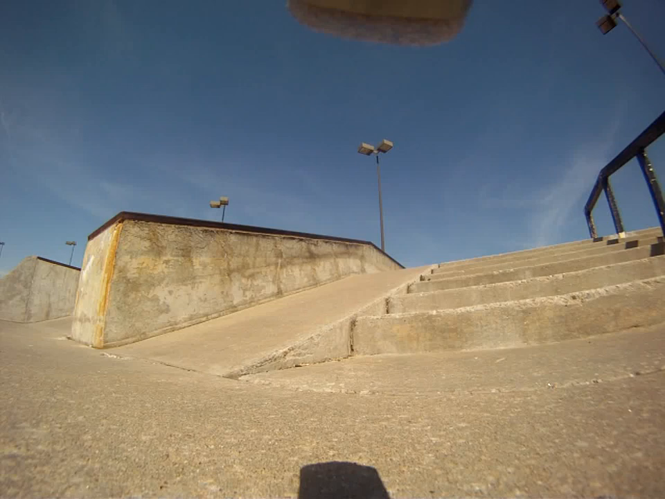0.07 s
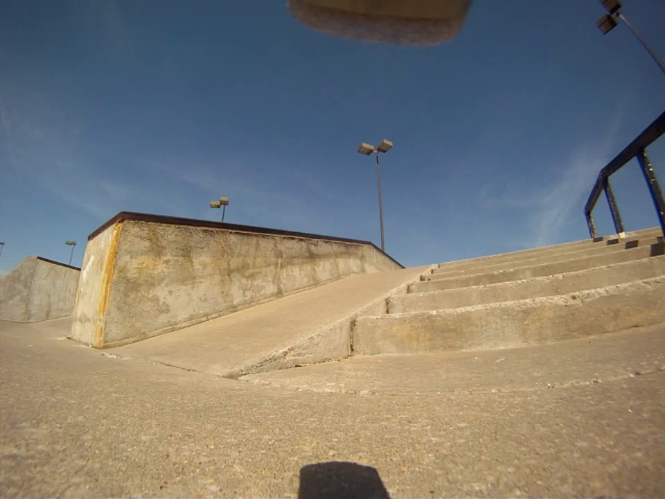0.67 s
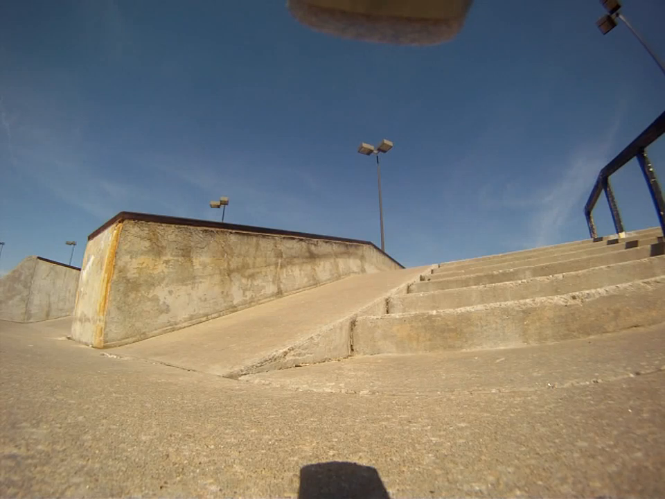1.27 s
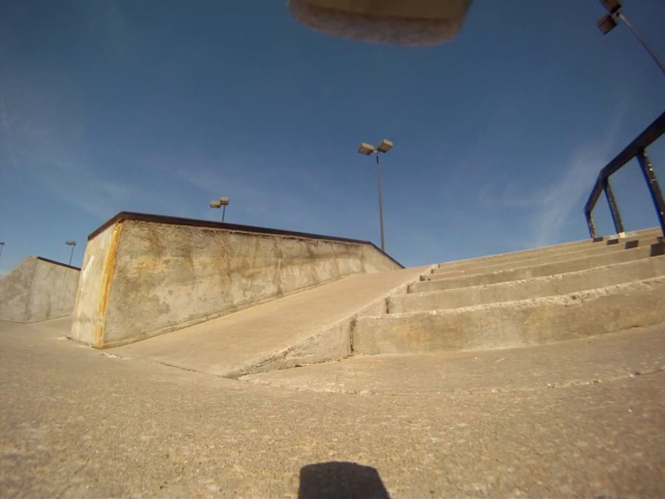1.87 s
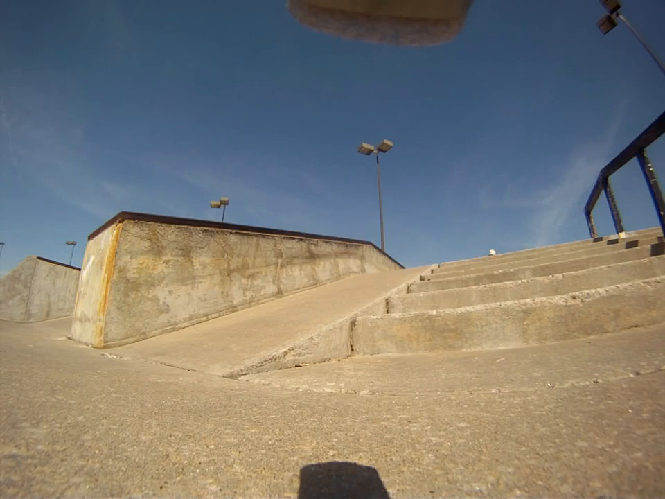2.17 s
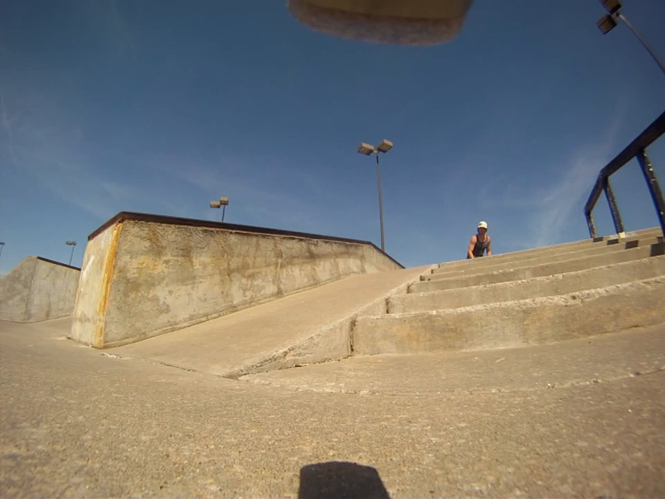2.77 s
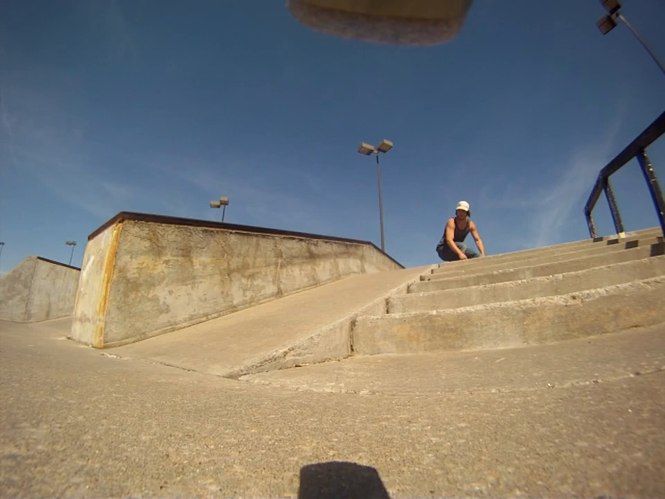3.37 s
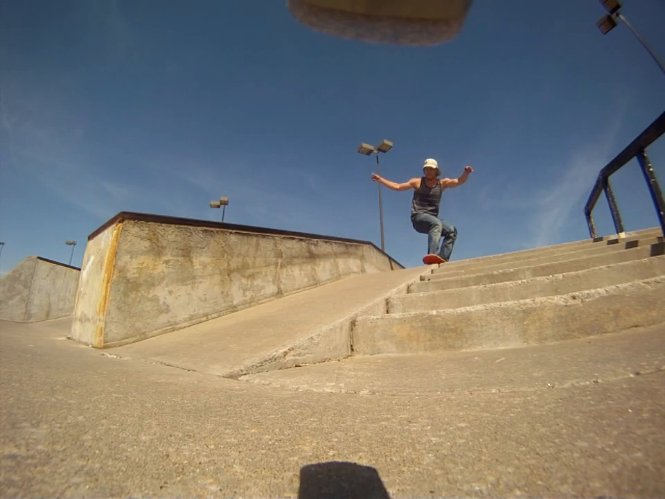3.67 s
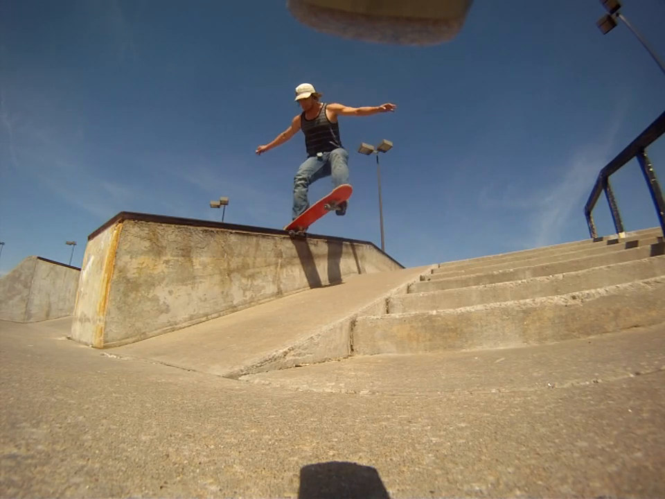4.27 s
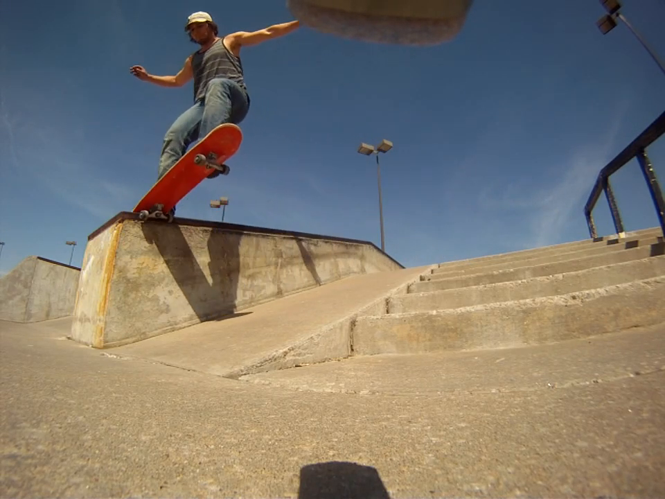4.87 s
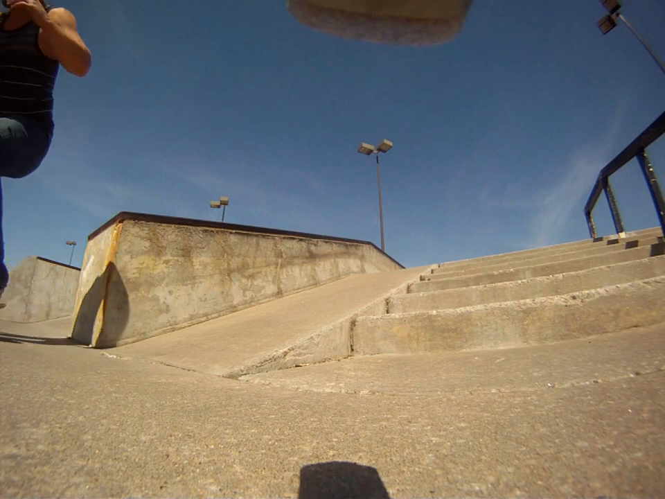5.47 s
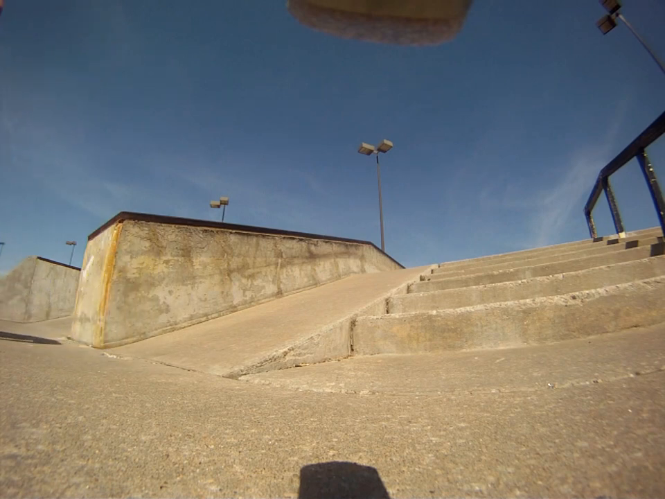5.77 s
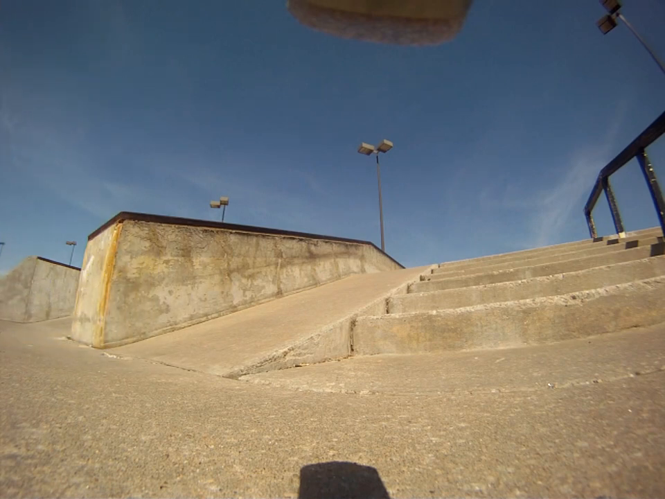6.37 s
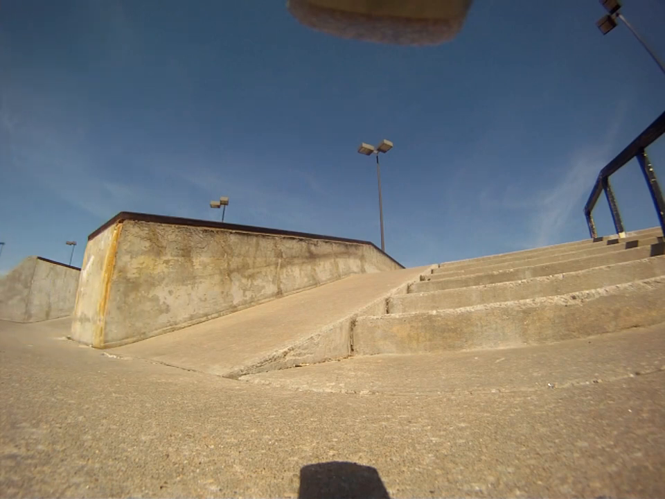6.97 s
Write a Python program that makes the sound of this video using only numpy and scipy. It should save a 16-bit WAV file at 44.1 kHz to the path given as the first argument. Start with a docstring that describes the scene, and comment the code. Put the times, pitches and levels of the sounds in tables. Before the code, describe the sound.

A skateboard approaches with a low hum of wheels, snaps into the air and hits a concrete ledge with sharp clacks. Its truck slides along the edge for under a second with a gritty scrape and wavering squeals. A hard landing thumps near the microphone, then the wheels roll off softly with a few ticks. The microphone sits on the ground in a quiet outdoor skate park and sounds a little plasticky and lo-fi.

```python
"""A skateboard grinds down a concrete ledge on one truck, its metal sticking and slipping into squeals
over a scrape of crushed grit. Hard wheels rumble up, the tail pops and the truck clacks onto the edge;
after the grind the maple deck slams down close by and rolls off, ticking over joints. Behind it is
the hush of an open skate park. All is heard from the ground, through a ringing plastic case and a
coarse 12 kHz converter that holds each sample."""
import sys
import numpy as np
from scipy import signal
from scipy.fft import rfft, irfft
from scipy.io import wavfile

SR = 44100
rng = np.random.default_rng(int(sys.argv[2]) if len(sys.argv) > 2 else 0)


def log_audio(samples):
    """Write samples as a 16-bit WAV file to the path given in sys.argv[1]."""
    # one column per channel
    frames = np.atleast_2d(samples).T
    # limit to full scale, then quantise
    limited = np.clip(frames, -1, 1)
    pcm = np.round(limited * 32767).astype(np.int16)
    wavfile.write(sys.argv[1], SR, pcm)


N = 319284
TIME = np.arange(N) / SR
POP_S = 3.8258   # the tail snaps on the ground


def from_db(db):
    """Decibels to gain."""
    return 10 ** (np.asarray(db) / 20)


def unit_rms(x):
    """Scale to an rms of 1."""
    return x / np.sqrt(np.mean(np.abs(x) ** 2) + 1e-20)


def automation(points):
    """Straight ramps between (time, value) breakpoints."""
    return np.interp(TIME, *np.transpose(points))


def swell(peak_s, half_s):
    """A bell-shaped rise and fall of height 1."""
    return np.exp(-((TIME - peak_s) / half_s) ** 2)


def drift(rate_hz):
    """Smooth random modulation with a spread of 1, drawn at every eighth sample."""
    pole = np.exp(-16 * np.pi * rate_hz / SR)
    noise = rng.standard_normal(N // 8 + 4002)
    slow = signal.lfilter([1], [1, -2 * pole, pole * pole], noise)[4000:]
    return np.interp(np.arange(N) / 8, np.arange(len(slow)), unit_rms(slow))


def narrow_noise(hz, width_hz):
    """Noise gathered around a pitch curve, rms about 1."""
    flutter = drift(width_hz) + 1j * drift(width_hz)
    return np.real(flutter * np.exp(2j * np.pi * np.cumsum(hz) / SR))


def grains(per_s, spread_db):
    """Grit: random clicks of uneven size, rms 1."""
    sizes = from_db(spread_db * np.minimum(rng.exponential(1, N), 4)) * rng.choice([-1, 1], N)
    return unit_rms(sizes * (rng.random(N) < per_s / SR))


def low_cut(x, hz, order):
    """Butterworth high-pass."""
    return signal.sosfilt(signal.butter(order, hz, "high", fs=SR, output="sos"), x)


def equalise(x, curve, rolloff_hz=7200, size=8192):
    """Minimum-phase EQ of unit energy that follows a curve and rolls off the top."""
    hz, db = np.transpose(curve)
    grid = np.maximum(np.arange(size // 2 + 1) * SR / size, 1)
    gain = from_db(np.interp(np.log(grid), np.log(hz), db)) / (1 + (grid / rolloff_hz) ** 8)
    cepstrum = irfft(np.log(gain))
    cepstrum[1:size // 2] *= 2   # folded forward, so nothing rings ahead of a hit
    cepstrum[size // 2 + 1:] = 0
    pulse = irfft(np.exp(rfft(cepstrum)))
    return signal.fftconvolve(x, pulse / np.linalg.norm(pulse))[:N]


def resonance(x, hz, width_hz):
    """Band-pass with a peak gain of 1."""
    r = np.exp(-np.pi * width_hz / SR)
    feedback = [1, -2 * r * np.cos(2 * np.pi * hz / SR), r * r]
    return signal.lfilter(np.array([1, 0, -1]) * (1 - r * r) / 2, feedback, x + 1e-18)


def ring(x, hz, t60):
    """One mode: a unit click starts a dying sine of height 1."""
    r, w = 10 ** (-3 / (t60 * SR)), 2 * np.pi * hz / SR
    return signal.lfilter([0, np.sin(w)], [1, -2 * r * np.cos(w), r * r], x + 1e-18)


def ring_body(force, modes, scatter_db=3.5):
    """A body rings; the contact point keeps shifting, and with it the share of each mode."""
    return sum(from_db(db) * ring(force * from_db(scatter_db * drift(44)), hz, t60) * (-1) ** k
               for k, (hz, db, t60) in enumerate(modes))


# tone of the outdoor bed: f/Hz, relative level/dB
AIR_EQ = [(15, -13), (35, -1), (65, 2.5), (150, -4), (300, -6.5), (600, -12), (1000, -13), (1500, -14),
          (1850, -19.5), (2400, -19.5), (3000, -21.5), (4200, -22.5), (6000, -26)]


def air(hush_db=-59.5, gust_db=-57):
    """Steady outdoor hush, with one soft gust on the case."""
    buffet = unit_rms(resonance(rng.standard_normal(N), hz=40, width_hz=23))
    gust = from_db(gust_db) * swell(peak_s=1.75, half_s=0.15) * buffet
    return from_db(hush_db) * equalise(rng.standard_normal(N), AIR_EQ) + gust


def park_reverb(x, wet_db=-24, t60=0.52, predelay_s=0.012):
    """Faint scatter from the steps and ramps around."""
    t = np.arange(SR) / SR
    tail = rng.standard_normal(SR) * from_db(-60 * t / t60) * (t > predelay_s)
    scatter = signal.fftconvolve(x, tail / np.linalg.norm(tail))[:N]
    return from_db(wet_db) * low_cut(scatter, hz=600, order=1)


# woody ring of the deck: f/Hz, relative level/dB, t60/s
DECK_MODES = [(386, -11, 0.029), (460, -14, 0.046), (583.3, -6.5, 0.037), (657, -9, 0.029),
              (848, -14.5, 0.048), (915, -7, 0.023), (1047, -2.5, 0.038), (1109, -1.5, 0.053),
              (1302, -14, 0.05), (1542, -7, 0.059), (1606, -6.5, 0.05), (2020, -14.5, 0.049),
              (2372, -0.5, 0.048), (2560, -4, .05), (3224, -4, 0.028), (3513, 0.5, 0.037)]


def deck(force):
    """The maple deck rings briefly under grit and hits."""
    return ring_body(force, DECK_MODES)


# run-up, landing and run-out on four wheels: start/s, end/s, rumble/dB, grit/dB (at the closest point)
ROLL_SPANS = [(2.19, 3.75, -40.5, -52.5), (5.248, 5.65, -50.5, -56.5), (5.958, 7.4, -55, -57.5)]
# the hum swells as the rider presses down: peak t/s, level/dB
HUM_SWELLS = [(2.78, -60), (3.04, -54), (3.7, -48.5), (6.5, -55.5)]
# sideways skids at take-off, landing and in turns: peak t/s, half-length/s, level/dB
SKID_SWELLS = [(3.85, .08, -51.5), (5.321, 0.056, -54), (5.635, 0.042, -52), (5.781, 0.062, -56),
               (6.356, 0.26, -65.5)]


def rolling_gains(pass_s=5.36, speed_m_per_s=3.72, closest_m=1.96, screen_db_per_s=4.0, fade_s=0.032):
    """Faders for rumble and grit: the pass-by, plus pushes and skids."""
    nearness = closest_m / np.hypot(closest_m, speed_m_per_s * (TIME - pass_s))
    # the top of the steps screens the run-up, less and less until the pop
    screening = from_db(-screen_db_per_s * np.maximum(POP_S - TIME, 0))
    rumble = sum(from_db(db) * swell(s, half_s=0.034) for s, db in HUM_SWELLS)
    grit = sum(from_db(db) * swell(s, half_s) for s, half_s, db in SKID_SWELLS)
    for start, end, rumble_db, grit_db in ROLL_SPANS:
        grounded = np.clip(np.minimum(TIME - start, end - TIME) / fade_s + 0.5, 0, 1)
        heard = nearness * screening * grounded
        rumble += from_db(rumble_db) * heard
        grit += from_db(grit_db) * heard
    return rumble, grit


# whirr of the spinning wheels, falling after they pass: t/s, f/Hz
WHIRR_GLIDE = [(3.7, 2288), (5.6, 2495), (6.4, 2050), (7.24, 2092)]
# tone of the grit under the wheels: f/Hz, relative level/dB
GRIT_EQ = [(60, -6), (300, -5), (800, -6.5), (1150, -0.5), (1550, 1), (1820, -4.5), (2400, -2), (2850, -11),
           (3200, -4), (3600, -6.5), (4050, -9), (4700, -15.5), (5200, -10), (6000, -6.5)]


def wheels(rumble_hz=170, width_hz=52, uneven_db=2, whirr_db=-5):
    """Hard wheels on rough concrete: the loaded board hums and rings, grit hisses, the wheels whirr."""
    rumble_gain, grit_gain = rolling_gains()
    uneven_ground = unit_rms(from_db(uneven_db * drift(16)))
    hum = resonance(rng.standard_normal(N), rumble_hz, width_hz)
    rumble = unit_rms(resonance(hum, rumble_hz, width_hz))
    ringing = from_db(-16) * narrow_noise(np.full(N, 1150), width_hz=70)
    stones = grains(per_s=5000, spread_db=2.16)
    grit = unit_rms(equalise(stones, GRIT_EQ) + from_db(-40) * deck(stones))
    airborne = from_db(-63) * swell(peak_s=3.98, half_s=0.13)
    far_off = from_db(-73) * swell(peak_s=0.36, half_s=0.46)
    whirr_gain = from_db(whirr_db) * grit_gain + airborne + far_off
    whirr = narrow_noise(automation(WHIRR_GLIDE), width_hz=190)
    return uneven_ground * (rumble_gain * (rumble + ringing) + grit_gain * grit + whirr_gain * whirr)


def crunch(t, decay_s):
    """A dying burst of crushed grit that holds all frequencies about evenly."""
    fade = np.exp(-t / decay_s)
    burst = rng.standard_normal(len(t)) * fade
    for _ in range(2):
        whitened = irfft(np.exp(1j * np.angle(rfft(burst))), len(t))
        burst = whitened * np.sqrt(fade)
    return burst / np.linalg.norm(burst) * np.linalg.norm(fade)


def hit(s, db, crunch_s, cutoff_hz, deck_db, truck_db, thump_db, push_s=0.0032):
    """One click and crunch: its start sample, and its sends to crack, deck, truck and thump."""
    t = np.arange(SR // 5) / SR
    contact = from_db(-2) * crunch(t, crunch_s)
    contact[0] += from_db(4)   # the click
    contact = signal.lfilter(*signal.butter(2, cutoff_hz, fs=SR), contact)
    push = np.sin(np.pi * np.minimum(t / push_s, 1))
    weight = from_db(thump_db) * push / push.sum()
    sends = np.array([contact, from_db(deck_db) * contact, from_db(truck_db) * contact, weight])
    return round(s * SR), from_db(db) * sends


# ticks over joints in the ground, plus one scuff just before the pop: t/s, level/dB
JOINT_HITS = [(2.635, -52), (3.776, -44), (5.383, -40), (5.516, -45), (5.61, -37), (6.007, -55),
              (6.47, -54), (6.9544, -42.5)]


def joint_ticks():
    """The wheels cross joints and rattle the trucks; a scuff ticks just before the pop."""
    return [hit(s, db, crunch_s=0.0067, cutoff_hz=3970, deck_db=-1, truck_db=2, thump_db=-1)
            for s, db in JOINT_HITS]


# knocks along the ledge: t/s, level/dB, crunch decay/s, cutoff/Hz
CHIP_HITS = [(4.24, -21.5, 0.0099, 3640), (4.408, -34, .007, 1600), (4.48, -32.5, .024, 1800),
             (4.586, -24.5, 0.012, 1790), (4.64, -35, .03, 1400), (4.868, -31.5, 0.017, 3050),
             (4.943, -36, 0.0078, 4500), (5.006, -35, 0.0036, 4500)]


def chip_knocks():
    """The sliding truck knocks over chips in the edge."""
    return [hit(*chip, deck_db=-1.5, truck_db=-1.5, thump_db=-19) for chip in CHIP_HITS]


def tail_pop():
    """The tail ticks on the concrete, the deck answers and bounces, and the shoe flicks it round."""
    body_s, bounce_s, flick_s = POP_S + 0.0026, POP_S + 0.019, 3.907
    return [hit(POP_S, -19, crunch_s=0.0063, cutoff_hz=7000, deck_db=-9, truck_db=-7, thump_db=-27),
            hit(body_s, -25, crunch_s=0.0038, cutoff_hz=2450, deck_db=12, truck_db=15.5, thump_db=-26),
            hit(bounce_s, -34, crunch_s=0.0017, cutoff_hz=2840, deck_db=0.5, truck_db=8.5, thump_db=-26),
            hit(flick_s, -38, crunch_s=0.014, cutoff_hz=4490, deck_db=-5.5, truck_db=7.5, thump_db=-27)]


# hard truck hits: t/s, level/dB, crunch decay/s, rebound delay/s, rebound level/dB
CLACK_HITS = [(4.1365, -10, 0.0043, 0.019, -13.5), (4.2045, -7.5, 0.0051, 0.019, -19),
              (4.2867, -16, 0.0042, .0215, -18), (5.2562, -3, 0.0012, .021, -33.5),
              (5.7919, -20.5, 0.0022, 0.015, -28)]


def truck_clacks(settle_s=0.0062, settle_db=-11):
    """Metal hits bright, settles a moment later, and comes back with a duller, ringing rebound."""
    hits = []
    for s, db, crunch_s, rebound_s, rebound_db in CLACK_HITS:
        hits += [hit(s, db, crunch_s, cutoff_hz=5500, deck_db=-3, truck_db=2.5, thump_db=-26),
                 hit(s + settle_s, db + settle_db, crunch_s=0.005, cutoff_hz=3710,
                     deck_db=-6, truck_db=-9.5, thump_db=-24),
                 hit(s + rebound_s, rebound_db, crunch_s=0.003, cutoff_hz=2500,
                     deck_db=-4, truck_db=10, thump_db=-30)]
    return hits


# wheels coming down under the rider's weight: t/s, level/dB, cutoff/Hz
SLAM_HITS = [(4.26, -25.5, 4200), (5.2172, -19, 1500), (5.2221, -7.5, 3400), (5.2358, -7, 3250),
             (5.2463, -14.5, 2800), (5.2516, -12, 2000), (5.801, -24, 2840)]


def wheel_slams(db_per_octave=9, firm_hz=3000):
    """The softer a wheel lands, the more of the blow goes into the deck."""
    hits = []
    for s, db, cutoff_hz in SLAM_HITS:
        soft_db = db_per_octave * np.log2(firm_hz / cutoff_hz)
        hits.append(hit(s, db, crunch_s=0.0093, cutoff_hz=cutoff_hz,
                        deck_db=2.5 + soft_db, truck_db=-4, thump_db=1 + soft_db))
    return hits


# tone of the contact crack: f/Hz, relative level/dB
CRACK_EQ = [(40, -10), (120, -24), (300, -2.5), (800, 3), (1700, 3.5), (2500, -9), (2950, 4.5),
            (3600, -7.5), (4100, -16.5), (4650, 6.5), (5200, 7), (6000, 4.5)]
# clank of the metal truck and axle: f/Hz, relative level/dB, t60/s
TRUCK_MODES = [(1757, -7, 0.014), (1990, -4.5, 0.024), (2228, -1, 0.023), (2502, -5.5, 0.017),
               (3837, -2, 0.016), (4860, -15.5, 0.027)]
# thump of the loaded deck flexing on its wheels: f/Hz, relative level/dB, t60/s
FLEX_MODES = [(157.4, -9, 0.23), (192.3, 0.5, 0.096)]


def board_impacts(crack_db=-6, deck_db=-31, truck_db=-25, thump_db=-8):
    """Each hit cracks and rings deck and truck; the rider's weight behind it flexes the deck."""
    buses = np.zeros((4, N + SR))
    for at, sends in tail_pop() + truck_clacks() + wheel_slams() + chip_knocks() + joint_ticks():
        buses[:, at:at + sends.shape[1]] += sends
    contact, wood, metal, weight = buses[:, :N]
    crack = from_db(crack_db) * equalise(contact, CRACK_EQ)
    knock = from_db(deck_db) * deck(low_cut(wood, hz=560, order=2))
    clank = from_db(truck_db) * ring_body(metal, TRUCK_MODES)
    flex = sum(from_db(db) * ring(weight, hz, t60) for hz, db, t60 in FLEX_MODES)
    # a narrow board radiates little below its flexing modes
    thump = from_db(thump_db) * low_cut(flex, hz=115, order=3)
    return crack + knock + clank + thump


# side squeaks: t/s, length/s, start f/Hz, end f/Hz, level/dB
SQUEAK_GLIDES = [(4.468, 0.053, 1500, 1196, -44.5), (4.495, 0.045, 1752, 1720, -40.5),
                 (4.639, 0.11, 1280, 1310, -44), (4.741, .035, 1262, 1120, -43),
                 (4.858, 0.035, 1220, 1290, -37)]


def edge_squeaks(width_hz=45):
    """The edge catches: brief stick-slip tones that swell and glide below the main squeal."""
    out = np.zeros(N)
    quiver = unit_rms(1 + drift(width_hz) + 1j * drift(width_hz))
    for s, length_s, start_hz, end_hz, db in SQUEAK_GLIDES:
        at, size = round(s * SR), round(length_s * SR)
        phase = 2 * np.pi * np.cumsum(np.linspace(start_hz, end_hz, size)) / SR
        tone = np.sqrt(2) * np.real(quiver[at:at + size] * np.exp(1j * phase))
        out[at:at + size] += from_db(db) * np.sin(np.linspace(0, np.pi, size)) * tone
    return out


# the truck breaks into a squeal: peak t/s, half-length/s, level/dB
SQUEAL_SWELLS = [(4.346, 0.026, -30), (4.567, .02, -40), (4.688, 0.03, -28), (4.808, 0.011, -38),
                 (4.913, 0.014, -33.5), (4.952, 0.012, -36.5)]


def truck_squeal(hz, steady_db=-44, waver=0.018, roughness=0.67, flutter_hz=110, octave_db=-16):
    """Metal sticks and slips: a wavering tone that bumps keep upsetting."""
    gain = from_db(steady_db) + sum(from_db(db) * swell(s, half_s) for s, half_s, db in SQUEAL_SWELLS)
    phase = 2 * np.pi * np.cumsum(hz * (1 + waver * drift(48))) / SR
    grip = unit_rms(1 + roughness * (drift(flutter_hz) + 1j * drift(flutter_hz)))
    swing = grip * np.exp(1j * phase)
    octave = from_db(octave_db) * swing ** 2 / np.abs(swing)   # added by the slips
    return gain * np.real(swing + octave)


# pitch of the stick-slip: t/s, f/Hz
SQUEAL_GLIDE = [(4.3, 2110), (4.35, 2180), (4.44, 2187), (4.5, 2078), (4.66, 2088), (4.76, 2210),
                (4.81, 1998), (4.845, 1680), (5.0, 2121)]
# pressure on the edge, riding the scrape and rasp: t/s, relative level/dB
EDGE_PRESSURE = [(4.33, -47), (4.384, -48.5), (4.428, -59), (4.536, -46.5), (4.576, -58.5), (4.71, -44.5),
                 (4.786, -60), (4.834, -51.5), (4.902, -55), (4.91, -47.5), (4.97, -56.5)]
# tone of metal scraping concrete: f/Hz, relative level/dB
SCRAPE_EQ = [(40, -22.5), (150, -8), (330, -1), (500, -6.5), (900, -6), (1250, 0), (1900, 2.5),
             (2700, -17.5), (3350, -8.5), (3750, 2), (4250, -5), (4650, -18.5), (5150, -4), (6000, -7)]


def grind(lock_s=4.15, leave_s=4.975, release_db_per_s=205.5, scrape_db=6, rasp_db=1, chatter_db=2):
    """The truck slides down the edge: a squeal and a rasp around it, over the scrape of crushed grit."""
    hz = automation(SQUEAL_GLIDE)
    squeal = truck_squeal(hz)
    chatter = unit_rms(from_db(chatter_db * drift(51)))
    friction = grains(per_s=9000, spread_db=2.5) * chatter
    scrape = unit_rms(equalise(friction, SCRAPE_EQ) + from_db(-35) * deck(friction))
    rasp = from_db(rasp_db) * chatter * narrow_noise(hz, width_hz=240)
    pressure = from_db(scrape_db + automation(EDGE_PRESSURE))
    on_ledge = (TIME > lock_s) * from_db(-release_db_per_s * np.maximum(TIME - leave_s, 0))
    return on_ledge * (squeal + pressure * (scrape + rasp))


def scene():
    """The board with its park reverb over the outdoor bed, in mono."""
    board = board_impacts() + grind() + edge_squeaks() + wheels()
    return (board + park_reverb(board) + air())[None]


def record(dry, ceiling=0.78, converter_hz=12000, hold=4):
    """The case rings, peaks are rounded, and held converter samples mirror the sound into the treble."""
    cased = dry + from_db(3.5) * resonance(dry, hz=2170, width_hz=320)
    rounded = ceiling * np.tanh(cased / ceiling)
    band = signal.sosfilt(signal.butter(16, 5700, fs=SR, output="sos"), rounded)
    coarse = signal.resample_poly(band, converter_hz, SR, axis=-1)
    held = np.repeat(coarse, hold, axis=-1)
    mirrored = signal.resample_poly(held, SR, hold * converter_hz, axis=-1)[:, :N]
    return signal.sosfilt(signal.ellip(10, 0.2, 80, 15400, fs=SR, output="sos"), mirrored)


dry = scene()
out = record(dry)
log_audio(out)
```